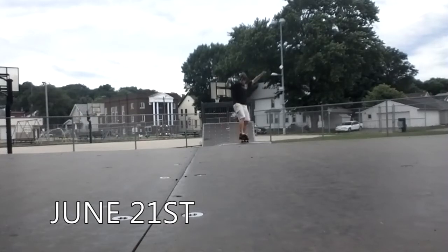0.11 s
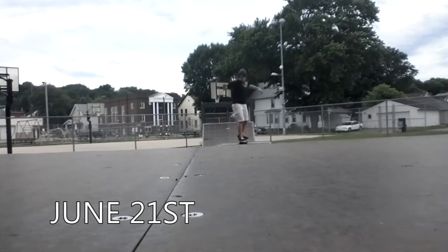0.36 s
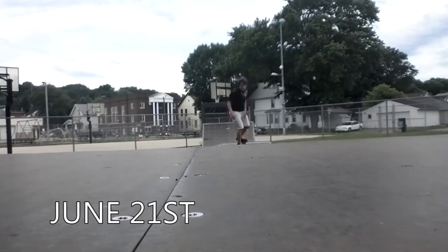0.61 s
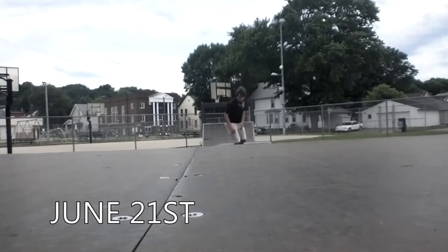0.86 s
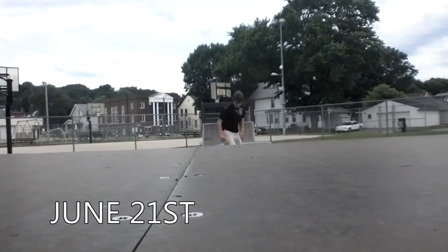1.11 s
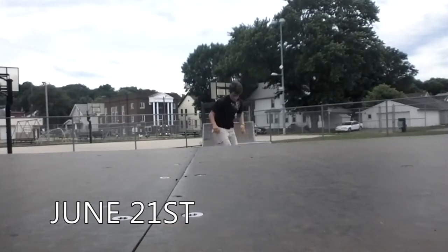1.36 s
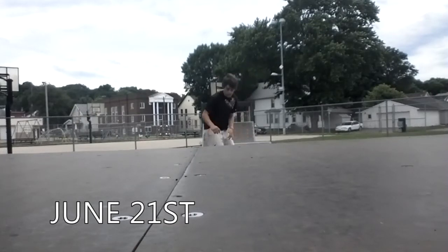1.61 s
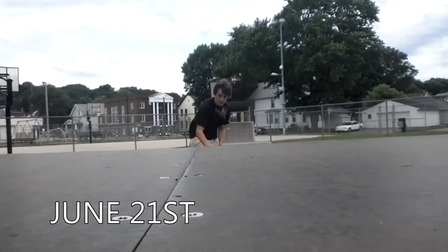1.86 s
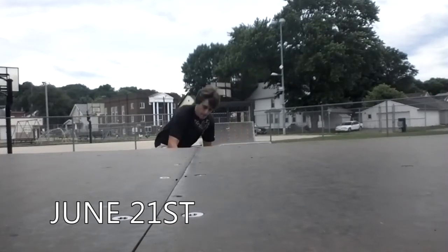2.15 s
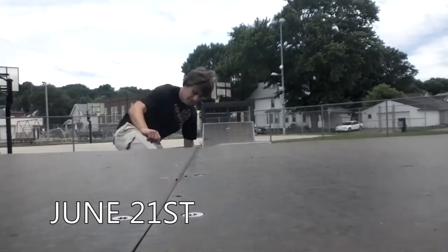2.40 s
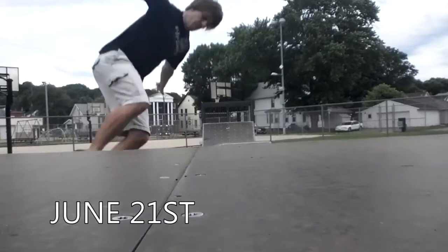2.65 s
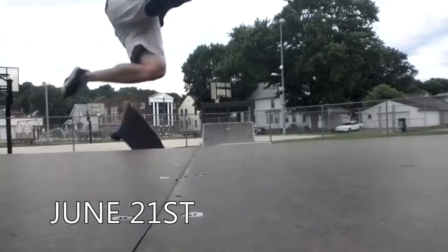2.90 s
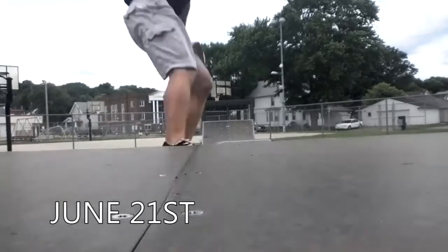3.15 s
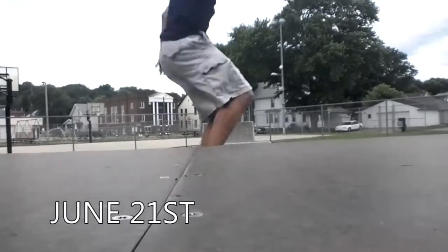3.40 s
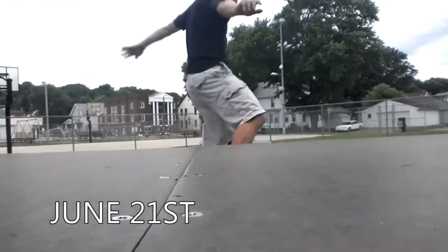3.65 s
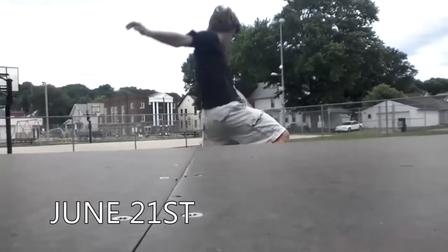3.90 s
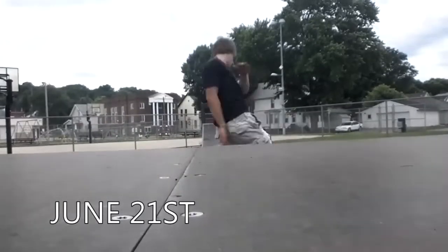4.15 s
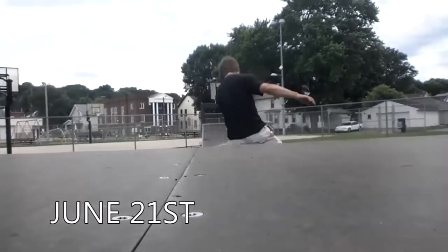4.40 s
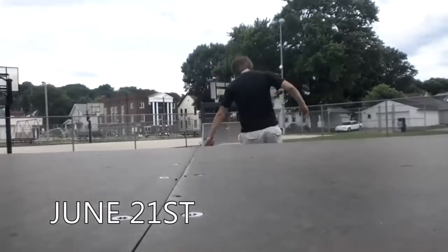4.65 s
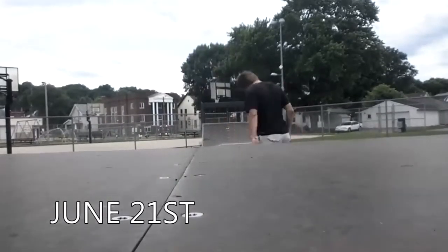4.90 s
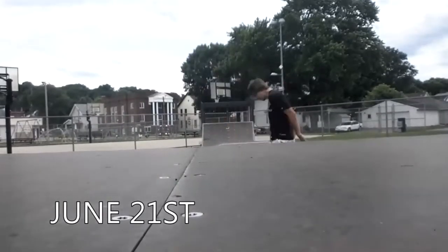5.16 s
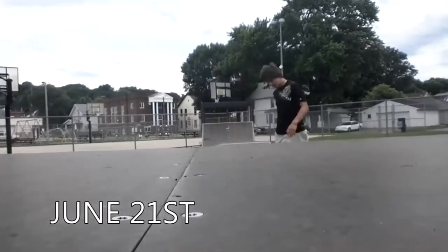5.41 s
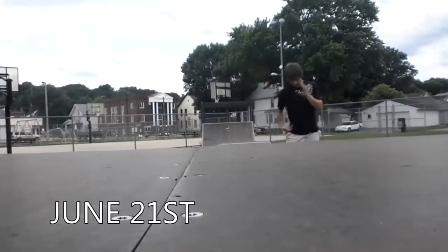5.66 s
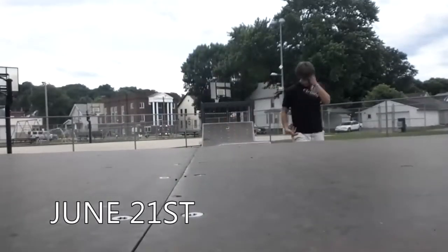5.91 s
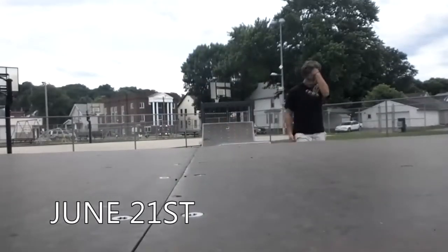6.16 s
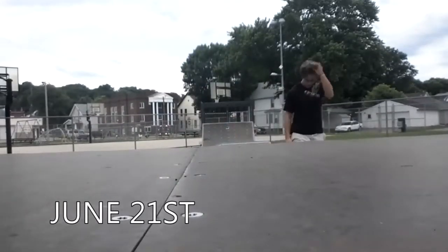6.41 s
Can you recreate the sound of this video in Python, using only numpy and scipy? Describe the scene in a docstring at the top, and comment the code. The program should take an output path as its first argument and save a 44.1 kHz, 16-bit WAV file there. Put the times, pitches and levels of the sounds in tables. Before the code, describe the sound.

Quiet gritty rolling and light wooden knocks come first, growing into hollow panel rumble. After a sharp clack and short shoe drag, the board hits right by the microphone: clipped cracks, rattling bolts, tiny sharp ticks. A deeper booming landing follows a little later, with short rolling and dying thumps. Then near silence in the open park, with small birds, dull echoes and a few faint board taps.

```python
"""Skateboarder on a hollow ramp

A skateboarder rolls up, pops the board, lands and rolls away; the microphone lies on the ramp's top.
Landings strike and shake the panel resonances hard enough to overload the input, and noise bursts rattle.
Wheels grind as resonated grains plus hiss, and a shoe drags as shaped noise. Boards clack as ringing modes
topped by a crack, and a loose part ticks by the microphone as a brief sine.
Small birds chirp in gliding sines over the shaped noise of the town; clacks and birds echo off fences and walls."""
import sys
import numpy as np
from scipy import signal
from scipy.fft import rfft, irfft, next_fast_len
from scipy.io import wavfile
from scipy.ndimage import uniform_filter1d

SR = 44100
rng = np.random.default_rng(int(sys.argv[2]) if len(sys.argv) > 2 else 0)


def natural_amplitude(level_db):
    """Convert a level in decibels to a linear amplitude factor, elementwise."""
    exponent = np.asarray(level_db, float) / 20
    return 10 ** exponent


def output_pcm(signal):
    """Save a mono or channel-first signal as 16-bit PCM at the path in sys.argv[1].

    Samples are clipped to [-1, 1] before scaling.
    """
    pcm = np.clip(np.atleast_2d(signal).T, -1, 1) * 32767
    wavfile.write(sys.argv[1], SR, np.round(pcm).astype(np.int16))


N = 287532   # length in samples
TOUCH_SPREAD_DB = 2.5   # chance in how strongly one blow excites each mode


def rms_one(x):
    """Scale to unit rms."""
    return x / np.sqrt(np.mean(x ** 2) + 1e-20)


def drift(rate_hz):
    """Slow random wander with rms 1, made at a fortieth of the sample rate."""
    pole = np.exp(-80 * np.pi * rate_hz / SR)
    noise = rng.standard_normal(N // 40 + 2002)
    slow = signal.lfilter([1], [1, -2 * pole, pole ** 2], noise)[2000:]   # skip the filter's start
    return np.interp(np.arange(N) / 40, np.arange(len(slow)), rms_one(slow))


def coloured(spectrum):
    """Noise shaped by a spectrum drawn over log frequency; rms 1."""
    hz, db = np.transpose(spectrum)
    size = next_fast_len(N)
    bin_hz = np.maximum(np.arange(size // 2 + 1) * SR / size, 1)
    gain = natural_amplitude(np.interp(np.log(bin_hz), np.log(hz), db))
    return rms_one(irfft(rfft(rng.standard_normal(size)) * gain, size)[:N])


def resonate(x, peaks):
    """Parallel two-pole resonances (f/Hz, width/Hz, level/dB), signs alternating."""
    out = 0
    for k, (hz, width_hz, db) in enumerate(peaks):
        r = np.exp(-np.pi * width_hz / SR)
        feedback = [1, -2 * r * np.cos(2 * np.pi * hz / SR), r * r]
        band = signal.lfilter(np.array([1, 0, -1]) * (1 - r * r) / 2, feedback, x)
        out = out + (-1) ** k * natural_amplitude(db) * band
    return out


def bursts(starts_s, levels_db, t60_s, rise_s):
    """Envelopes that rise fast and die exponentially, summed as power."""
    power = np.zeros(N)
    for start_s, level_db in zip(starts_s, levels_db):
        at = round(start_s * SR)
        t = np.arange(N - at)[:SR] / SR
        envelope = natural_amplitude(level_db - 60 * t / t60_s) * (1 - np.exp(-t / rise_s))
        power[at:at + len(t)] += envelope ** 2
    return np.sqrt(power)


def grains(per_s, spread_db):
    """Random clicks of uneven size; rms 1."""
    sizes = natural_amplitude(spread_db * np.minimum(rng.exponential(1, N), 5)) * rng.choice([-1, 1], N)
    return rms_one(sizes * (rng.random(N) < per_s / SR))


def in_time(rows):
    """Columns of a time curve, drawn out to every sample."""
    s, *columns = np.transpose(rows)
    return [np.interp(np.arange(N) / SR, s, column) for column in columns]


def struck(starts_s, peaks_db, t60_s, modes, rise_s):
    """Every landing rings all panel modes at once, with its own strengths and a swell of a few ms."""
    out = np.zeros(N)
    chance_db = rng.normal(0, TOUCH_SPREAD_DB, (len(starts_s), len(modes)))
    hz, width_hz, mode_db = np.transpose(modes)[:, :, None]
    for start_s, peak_db, row_db in zip(starts_s, peaks_db, chance_db):
        at = round(start_s * SR)
        t = np.arange(N - at)[:SR // 2] / SR
        rings = natural_amplitude(mode_db + row_db[:, None]) * np.sin(2 * np.pi * hz * t) * np.exp(-np.pi * width_hz * t)
        rings = rings.sum(axis=0) * (1 - np.exp(-t / rise_s))
        out[at:at + len(t)] += natural_amplitude(peak_db - 60 * t / t60_s) * rings / np.abs(rings).max()
    return out


def panels(modes, rumble_db, starts_s, hits_db, t60_s, blow_db, shudder_db, rise_s):
    """Rolling shakes the panels; a landing strikes them, then the frame shudders on."""
    rumble = natural_amplitude(rumble_db + 1.65 * drift(4.5))
    shudder = bursts(starts_s, hits_db + shudder_db, t60_s, rise_s)
    shaken = np.hypot(rumble, shudder) * rms_one(resonate(grains(600, spread_db=2.0), modes))
    return shaken + natural_amplitude(blow_db) * struck(starts_s, hits_db, t60_s, modes, rise_s)


# weight landing on the ramp: [t/s, large-panel level/dB, small-panel level/dB, rattle level/dB];
# the panel levels stand before the blow and shudder trims
LANDINGS = [(0.016, -32, -32, -31), (0.085, -40, -31, -25), (0.174, -48, -36, -34.5),
            (0.209, -41, -43, -44), (1.108, -33, -18, -22.5), (1.137, -27, -19, -36),
            (1.206, -23, -23, -23.5), (1.446, -33, -27.5, -26.5), (2.141, 2, -5, -9.5),
            (2.177, -4, -6.5, -6), (2.212, -6, -14, -25), (2.248, -3, -9.5, -12.5), (2.271, -7, -9.5, -18),
            (2.297, -6.5, -30, -29), (2.464, -12, -17.5, -25.5), (2.502, -11.5, -21, -22),
            (2.547, -5.5, -23.5, -35), (2.925, -12, -23.5, -43), (2.934, 4.5, -4, -19.5),
            (2.966, 2.5, -39, -14), (3.057, 0, -16.5, -46), (3.31, -4.5, -21.5, -30.5),
            (3.345, -26, -27, -54), (3.509, -19, -33, -51), (3.641, -15, -10.5, -22.5),
            (3.691, -17.5, -22, -29), (3.889, -26.5, -60, -65), (5.229, -25.5, -43, -36),
            (5.789, -51, -42, -32.5)]
# weight rolling on the ramp: [t/s, large-panel rumble level/dB, small-panel rumble level/dB]
ROLLING_WEIGHT = [(0.0, -45, -34.5), (0.18, -47, -26), (0.29, -49, -45.5), (0.78, -45.5, -50.5),
                  (1.07, -49.5, -42.5), (1.17, -19, -22), (1.28, -28, -24), (1.5, -26.5, -36),
                  (1.89, -34.5, -43), (2.16, -50.5, -67), (2.32, -28, -19), (2.45, -24, -32.5),
                  (2.87, -33, -43), (3.0, -22.5, -22.5), (3.3, -25, -33), (3.58, -38.5, -50.5),
                  (3.75, -32, -49), (4.03, -46.5, -54), (4.9, -49, -54), (5.17, -39, -48.5),
                  (5.47, -50.5, -52), (6.52, -46, -55)]
# resonances of the large ramp panels: [f/Hz, width/Hz, relative level/dB]
LARGE_PANELS = [(33.3, 23, -8.5), (43.8, 8.9, -1), (54, 10, -6.5), (76.4, 4.9, 4.5), (111.7, 12.3, 1.5),
                (131, 51.3, -8)]
# resonances of the small ramp panels: [f/Hz, width/Hz, relative level/dB]
SMALL_PANELS = [(149.7, 15, 2.5), (175.2, 42, 0), (210.3, 18, 4.5), (241, 10.5, 3.5), (274.2, 33.6, -1),
                (309.6, 31, -1), (340.3, 20, 1), (418.4, 71, -9), (495, 30, -4.5), (576, 122, -12.5),
                (749, 43, -11.5), (868, 29, -16.5)]
# spectrum of rattling bolts and sheets: [f/Hz, relative level per Hz/dB]
RATTLE = [(470, -27), (800, 9.5), (1110, 1), (1610, -2), (2570, -6), (3420, -1.5), (6650, -14.5),
          (8230, -16), (16000, -41)]


def ramp():
    """Large and small panels boom, and bolts and sheets rattle after each landing."""
    large_rumble_db, small_rumble_db = in_time(ROLLING_WEIGHT)
    s, large_db, small_db, rattle_db = np.transpose(LANDINGS)
    large = panels(LARGE_PANELS, large_rumble_db, s, large_db, t60_s=0.26,
                   blow_db=-11.0, shudder_db=-5.0, rise_s=0.0011)
    small = panels(SMALL_PANELS, small_rumble_db, s, small_db, t60_s=0.15,
                   blow_db=0.5, shudder_db=2.5, rise_s=0.0034)
    rattle = bursts(s, rattle_db, t60_s=0.14, rise_s=0.0035) * coloured(RATTLE)
    return large + small + rattle * natural_amplitude(0.85 * drift(45))


# wheels on the ground: [t/s, drone level/dB, grit hiss level/dB]
ROLL = [(0.0, -35, -52), (0.16, -32, -43.5), (0.26, -34.5, -48.5), (0.36, -39.5, -42), (0.57, -37.5, -50),
        (0.72, -34.5, -44), (1.07, -38.5, -47), (1.16, -33.5, -40), (1.29, -41.5, -44), (1.49, -44, -51.5),
        (1.75, -49, -44), (2.14, -52, -53), (2.21, -27, -25), (2.4, -42, -43), (2.59, -48, -51),
        (2.7, -47, -45.5), (2.87, -51, -53), (2.98, -37.5, -39.5), (3.16, -35, -39), (3.43, -51, -50.5),
        (3.72, -61, -50.5), (3.89, -57.5, -56.5), (5.81, -54.5, -57), (6.01, -45, -49), (6.23, -52, -59),
        (6.52, -55, -58)]
# resonances of wheels and trucks: [f/Hz, width/Hz, relative level/dB]
WHEELS = [(460, 160, -3), (640, 170, 0), (900, 260, -2), (1250, 280, -1), (1570, 280, -2.5),
          (1880, 300, -5)]
# spectrum of the grit hiss: [f/Hz, relative level per Hz/dB]
GRIT = [(1290, -61), (2200, 7), (2690, 0.5), (4390, 1), (5660, -2), (6750, -12), (7660, -4.5),
        (10400, -11.5), (15400, -22.5), (16100, -35), (16500, -56)]
TILT_DB_PER_OCTAVE, TILT_FOLLOWS_GRIT = 1.5, 0.37   # rougher ground brightens the drone
DRONE_TOP_HZ, GRIT_FOOT_HZ = 2250, 2500


def wheels():
    """Surface roughness drives the wheel resonances, the upper ones more on rough ground, and hisses above."""
    drone_db, grit_db = in_time(ROLL)
    tilt_db = TILT_DB_PER_OCTAVE + TILT_FOLLOWS_GRIT * (grit_db - drone_db)
    bumps_db = drift(21)
    rough = grains(2500, spread_db=1.0)
    pivot_hz = WHEELS[2][0]
    drone = np.zeros(N)
    for k, peak in enumerate(WHEELS):
        gain_db = 2.0 * drift(5) + tilt_db * np.log2(peak[0] / pivot_hz)
        drone += (-1) ** k * natural_amplitude(gain_db) * resonate(rough, [peak])
    band = signal.butter(6, [380, DRONE_TOP_HZ], "band", fs=SR, output="sos")
    drone = signal.sosfilt(band, drone)
    drone /= np.sqrt(uniform_filter1d(drone ** 2, size=SR // 5))   # even out, so the tilt leaves the level alone
    treble = signal.butter(3, GRIT_FOOT_HZ, "high", fs=SR, output="sos")
    grit = rms_one(signal.sosfilt(treble, coloured(GRIT)))
    grit_gain = natural_amplitude(grit_db + 0.81 * bumps_db + 0.5 * drift(36))
    return natural_amplitude(drone_db + bumps_db) * drone + grit_gain * grit


# wood or wheel against a hard edge: [t/s, ring peak level/dB, centre f/Hz, crack peak level over the ring/dB]
CLACKS = [(0.019, -25, 664, -32), (0.089, -19, 1200, -10), (0.175, -17.5, 1200, -20),
          (0.367, -33.5, 877, -7), (0.395, -25, 684, -4), (0.43, -18, 635, -13), (1.105, -19, 710, -24),
          (1.204, -19.5, 821, -25), (1.391, -27, 920, -6), (1.449, -32, 800, 8.5),
          (1.7785, -6.5, 1330, -3.5), (1.785, -20, 1730, 5.5), (1.799, -25, 730, 0), (2.142, 0, 1070, 0.5),
          (2.176, 9, 690, -11), (2.238, 7.5, 730, -6.5), (2.469, -13.5, 820, -7.5), (2.504, -19.5, 740, -5),
          (2.937, -15, 577, -32), (3.024, -18, 1145, -22), (3.051, -10.5, 544, -32),
          (3.112, -28, 1400, -19), (3.204, -25, 623, 3.5), (3.273, -25, 606, 1), (3.505, -28.5, 730, 2.5),
          (3.632, -20, 810, -30), (3.639, -14.5, 820, -11), (3.656, -24, 673, -7), (3.687, -33.5, 748, 12),
          (3.962, -50, 816, 5), (4.251, -26, 1770, -3.5), (4.269, -27.5, 880, -14),
          (4.623, -36.5, 880, -21), (5.226, -26, 720, -6), (5.239, -34, 1080, -16),
          (5.789, -30, 1180, -5.5), (5.927, -16.5, 1310, -11), (5.928, -19.5, 633, -30),
          (5.978, -23.5, 700, -6), (6.008, -31, 680, -4), (6.081, -31.5, 695, -1), (6.267, -40.5, 1320, 0),
          (6.499, -41.5, 1250, 2.5)]
# modes of the board: [f/Hz, relative level/dB, t60/s before scaling to the mean CLACK_T60_S]
DECK = [(480, -5, .05), (678, -1, .055), (860, -1, .055), (1080, -3, .05), (1255, -1, .06),
        (1420, -2, .055), (1712, -2, .045), (1910, -4, .05), (2200, -5, .045), (2710, -6, .045)]
# spectrum of the crack: [f/Hz, relative level per Hz/dB]
CRACK = [(600, -26), (1200, -0.5), (2500, 4.5), (4500, 5), (5800, 3), (6750, -10), (7700, 2.5), (11000, -9),
         (16000, -21), (16600, -55)]
CLACK_T60_S, CRACK_LINGER = 0.039, 1.3   # mean ring decay; crack t60 over ring t60
FOCUS_DB, CONTACT_S = 11, 0.0004   # fall per squared octave from the centre; length of the touch
CREST_DB = 8   # noise peaks stand this far above its rms
SNAP_DB, SNAP_T60_S = 3, 0.008   # first instant of the crack, over its tail


def clacks():
    """Each blow rings the board's modes near its centre, with splinters of noise in them and a crack on top."""
    s, peaks_db, centres_hz, treble_db = np.transpose(CLACKS)
    hz, mode_db, mode_t60 = np.transpose(DECK)[:, :, None]
    mode_t60 = mode_t60 * CLACK_T60_S / np.mean(mode_t60)
    chance_db = rng.normal(0, TOUCH_SPREAD_DB, (len(s), len(DECK)))
    splinters = np.array([rms_one(resonate(rng.standard_normal(N), [(f, 220, 0)])) for f in hz[:, 0]])
    out = np.zeros(N)
    for start_s, peak_db, centre_hz, row_db in zip(s, peaks_db, centres_hz, chance_db):
        at = round(start_s * SR)
        t = np.arange(N - at)[:SR // 5] / SR
        tones = np.sin(2 * np.pi * hz * t) * (1 - np.exp(-t / CONTACT_S))
        noise = 0.6 * splinters[:, at:at + len(t)] * (1 - np.exp(-t / 0.0012))
        focus_db = -FOCUS_DB * np.log2(hz / centre_hz) ** 2
        gain = natural_amplitude(mode_db + row_db[:, None] + focus_db - 60 * t / mode_t60)
        rings = (gain * (tones + noise)).sum(axis=0)
        out[at:at + len(t)] += natural_amplitude(peak_db) * rings / np.abs(rings).max()
    crack_db = peaks_db + treble_db - CREST_DB
    snap = bursts(s, crack_db + SNAP_DB, SNAP_T60_S, rise_s=0.0003)
    tail = bursts(s, crack_db, CRACK_LINGER * CLACK_T60_S, rise_s=0.00062)
    return out + np.hypot(snap, tail) * coloured(CRACK)


# loose part ticking at the microphone: [t/s, starting level/dB]
TICKS = [(2.174, 28), (2.208, 2), (2.2503, -1), (2.2942, 0), (2.542, -23), (3.025, -7), (3.0673, -12),
         (3.1133, -1.5), (3.1622, -2.5), (3.2953, -20.5), (4.906, -28), (5.17, -37)]
TICK_HZ, TICK_SPREAD = 8130, 0.084   # mean pitch; its chance as a share


def ticks():
    """A tiny hard part rings for a few cycles, each time at a slightly different pitch."""
    out = np.zeros(N)
    t = np.arange(SR // 100) / SR
    for s, db in TICKS:
        at = round(s * SR)
        hz = TICK_HZ * (1 + rng.normal(0, TICK_SPREAD))
        out[at:at + len(t)] += natural_amplitude(db - 60 * t / 0.0011) * np.sin(2 * np.pi * hz * t)
    return out


# shoe dragging over grip tape: [loudest moment t/s, rms level/dB, swell/dB per s, fade/dB per s]
SCUFFS = [(1.773, -32, 260, 1300), (1.89, -40, 220, 200), (2.0, -36, 105, 104)]
# spectrum of the dragging sole: [f/Hz, relative level per Hz/dB]
SOLE = [(410, -37), (700, -4), (869, -8), (950, -2), (1660, -2.5), (1830, -2.5), (2000, -6.5),
        (4190, -13.5), (6000, -27), (7800, -53), (13200, -120)]
LIFT_OFF_S = 2.11   # the shoe leaves the tape


def scuff():
    """Dense slips of rubber on grit, as shaped noise; each drag swells and fades."""
    t = np.arange(N) / SR
    drags_db = [db - np.maximum(swell * (s - t), fade * (t - s)) for s, db, swell, fade in SCUFFS]
    level_db = np.max(drags_db, axis=0) - 600 * np.maximum(t - LIFT_OFF_S, 0)
    return natural_amplitude(level_db + 1.2 * drift(35)) * coloured(SOLE)


# whistles that arch up and down: [start t/s, length/s, top f/Hz, level/dB]
WHISTLES = [(4.04, .08, 3950, -52), (5.25, .085, 4020, -49), (5.41, .06, 3100, -57)]
# chirps that slide, fast at first: [start t/s, length/s, start f/Hz, end f/Hz, level/dB]
CHIRPS = [(2.84, .06, 2500, 2350, -50), (4.5, .09, 3100, 3010, -58), (4.755, .035, 4250, 4190, -55),
          (4.8, .07, 3900, 3800, -60), (4.85, .14, 2600, 2330, -63), (5.02, .065, 2900, 2280, -57),
          (5.5, .085, 2950, 2580, -56), (5.505, .045, 3800, 4000, -50), (5.53, .035, 4400, 4300, -54),
          (6.01, .05, 2500, 2680, -56), (6.105, .075, 3100, 2640, -52), (6.265, .02, 4200, 3850, -54)]
ARCH = 0.09   # share of the whistle's pitch lost at both ends
HOARSE_S = 0.007   # pitch shake is this over the length, squared: short notes are hoarse
BIRD_HAZE_DB, BIRD_HAZE_T60_S = -6, 0.25   # trees and walls blur the notes


def birds():
    """Near-sine notes on a curved pitch path; short ones shake more in pitch, and a haze trails them all."""
    notes = []
    for s, length_s, top_hz, db in WHISTLES:
        u = np.linspace(0, 1, round(length_s * SR))
        notes.append((s, length_s, db, u, top_hz * (1 - ARCH * (2 * u - 1) ** 2)))
    for s, length_s, start_hz, end_hz, db in CHIRPS:
        u = np.linspace(0, 1, round(length_s * SR))
        notes.append((s, length_s, db, u, end_hz + (start_hz - end_hz) * (1 - u) ** 2))
    out, shake = np.zeros(N), drift(150)
    for s, length_s, db, u, path_hz in notes:
        at = round(s * SR)
        depth = min(0.03, (HOARSE_S / length_s) ** 2)
        hz = path_hz * (1 + depth * shake[at:at + len(u)])
        swell = np.minimum(1, 6 * np.minimum(u, 1 - u))
        out[at:at + len(u)] += natural_amplitude(db) * swell * np.sin(2 * np.pi * np.cumsum(hz) / SR)
    t = np.arange(round(BIRD_HAZE_T60_S * SR)) / SR
    haze = rng.standard_normal(len(t)) * natural_amplitude(-60 * t / BIRD_HAZE_T60_S)
    out = out + natural_amplitude(BIRD_HAZE_DB) * signal.fftconvolve(out, haze / np.linalg.norm(haze))[:N]
    return out * natural_amplitude(3 * drift(60))


# fences and house walls: [delay t/s, level/dB before the dulling low-pass]
ECHOES = [(.017, -21), (.031, -25), (0.053, -22), (0.084, -27), (.121, -33), (.155, -34)]


def park(x):
    """Adds a few dull echoes, each smeared by a rough surface."""
    answer = np.zeros(SR // 4)
    t = np.arange(SR // 25) / SR
    for delay_s, db in ECHOES:
        smear = rng.standard_normal(len(t)) * natural_amplitude(-60 * t / 0.016)
        at = round(delay_s * SR)
        answer[at:at + len(t)] += natural_amplitude(db) * smear / np.linalg.norm(smear)
    echoes = signal.fftconvolve(x, answer)[:N]
    return x + signal.lfilter([0.45], [1, -0.55], echoes)   # one-pole low-pass


# spectrum of the town's hum: [f/Hz, relative level per Hz/dB]
TOWN = [(15, -36), (25, 6), (70, -18), (103, 3), (208, -7), (410, -19), (553, -21), (787, -6.5),
        (2150, -23), (4600, -18.5), (6730, -34), (11500, -29), (15200, -52), (16500, -65)]


def town():
    """The hum of the town: steady shaped noise with a very slight wander in level."""
    return natural_amplitude(-52.5 + 0.097 * drift(4.3)) * coloured(TOWN)


def scene():
    """All sources at the microphone, in one channel."""
    echoed = park(clacks() + birds())
    return np.array([ramp() + wheels() + scuff() + echoed + ticks() + town()])


def overload(x):
    """The input flattens strong shaking: nearly linear below the limit, then a hard knee."""
    limit, hardness = 0.49, 15
    return x / (1 + np.abs(x / limit) ** hardness) ** (1 / hardness)


def top_cut(x):
    """Nothing passes above the cut-off."""
    return signal.sosfilt(signal.butter(12, 16810, fs=SR, output="sos"), x)


def record(dry):
    """The microphone input overloads on the loudest landings."""
    mix = overload(dry)
    return top_cut(mix)


dry = scene()
out = record(dry)
output_pcm(out)
```